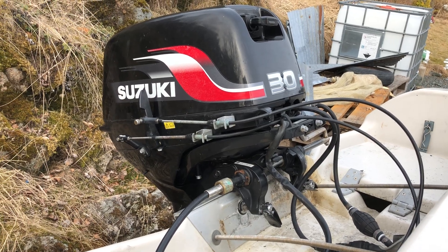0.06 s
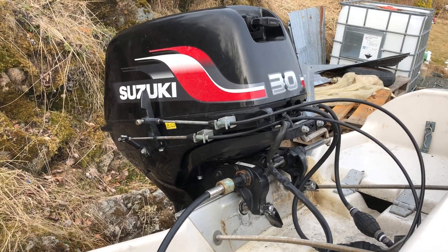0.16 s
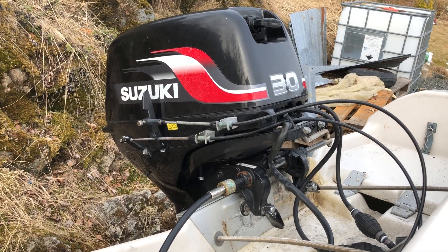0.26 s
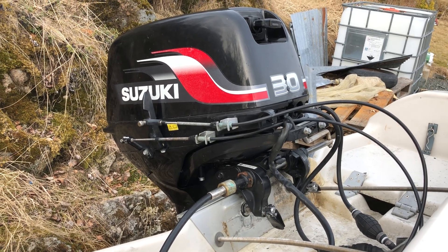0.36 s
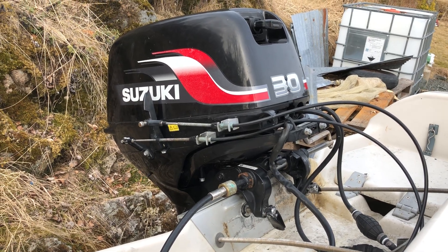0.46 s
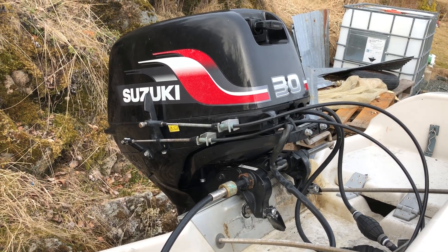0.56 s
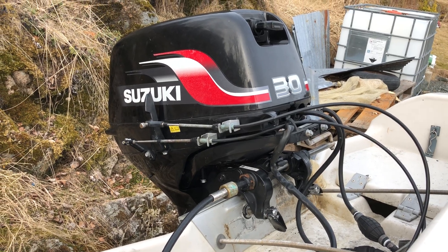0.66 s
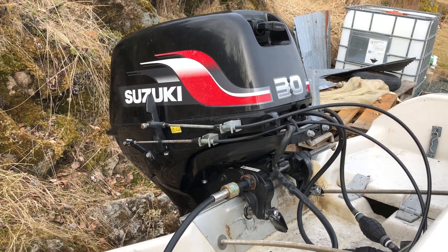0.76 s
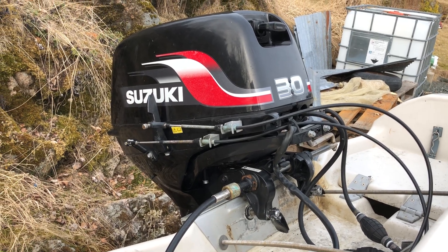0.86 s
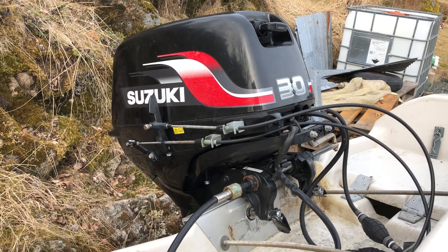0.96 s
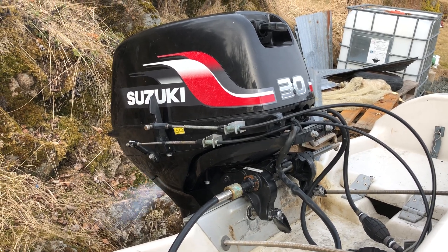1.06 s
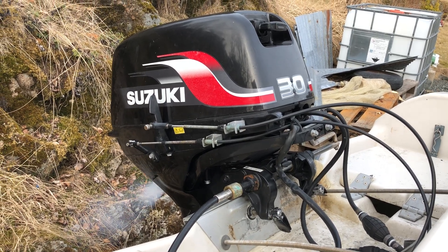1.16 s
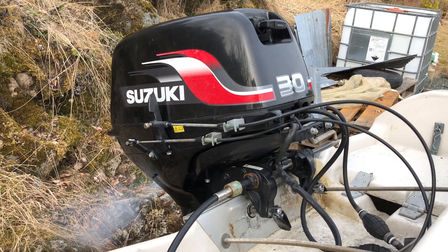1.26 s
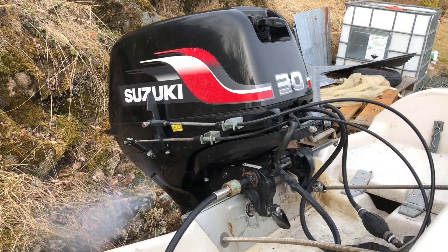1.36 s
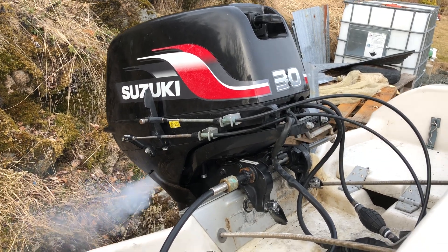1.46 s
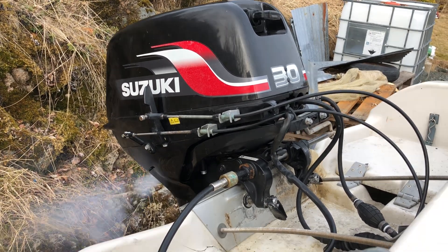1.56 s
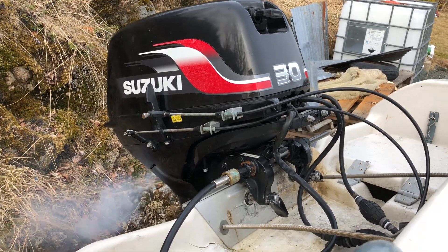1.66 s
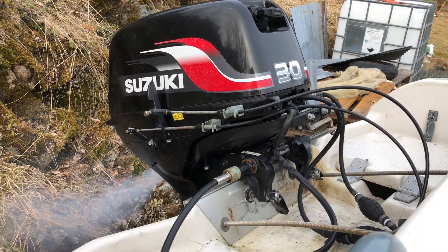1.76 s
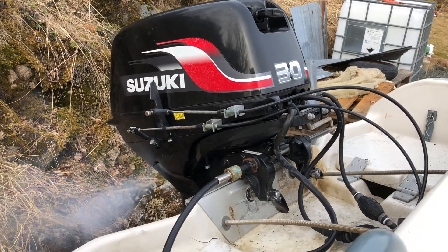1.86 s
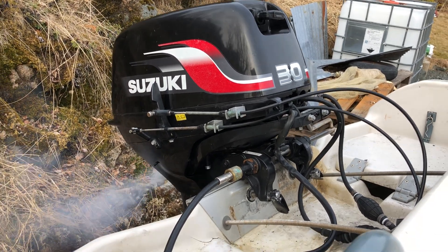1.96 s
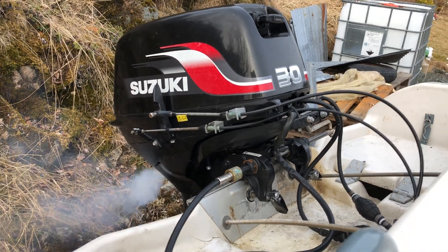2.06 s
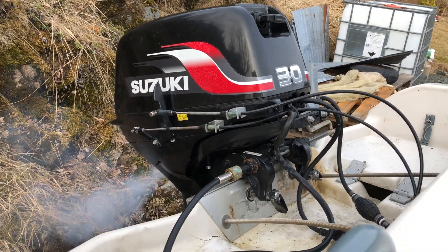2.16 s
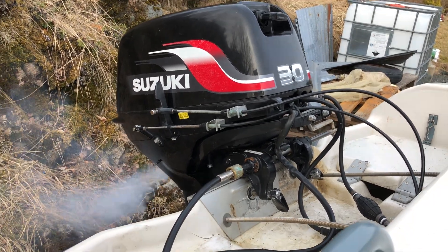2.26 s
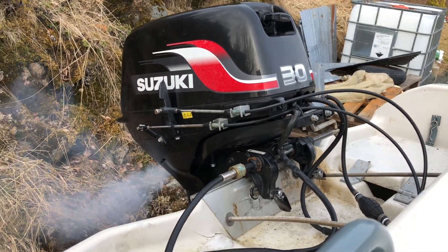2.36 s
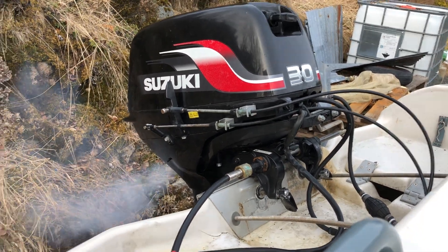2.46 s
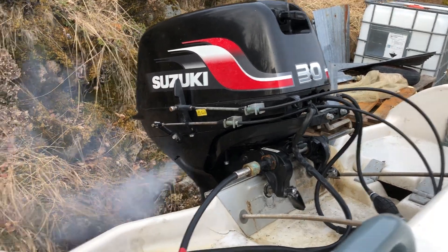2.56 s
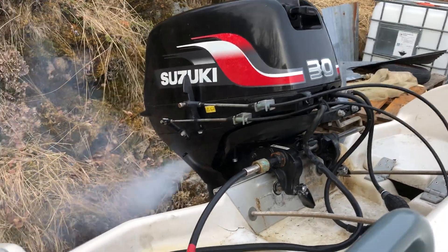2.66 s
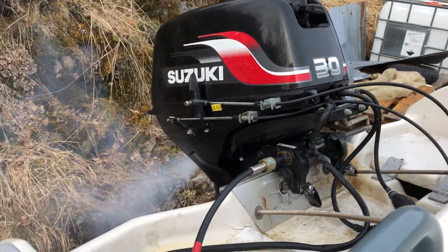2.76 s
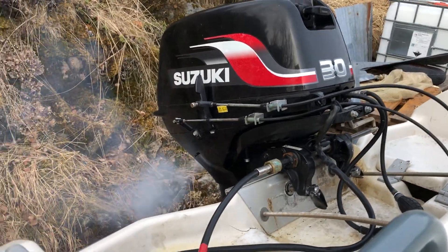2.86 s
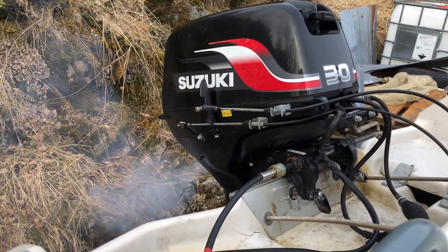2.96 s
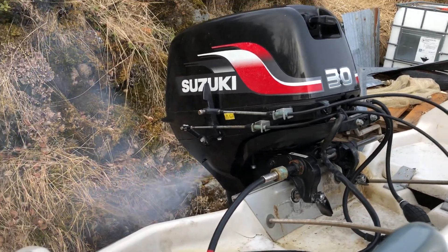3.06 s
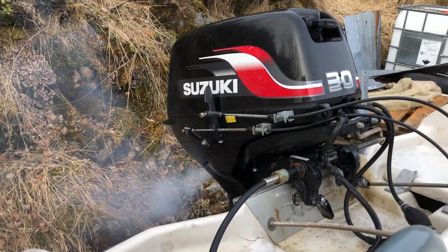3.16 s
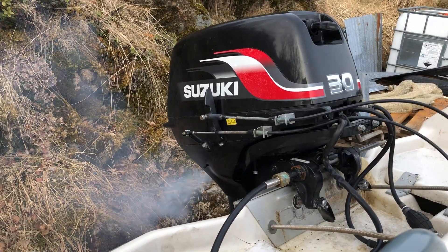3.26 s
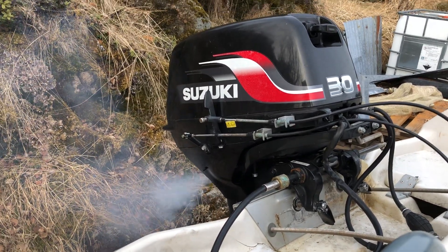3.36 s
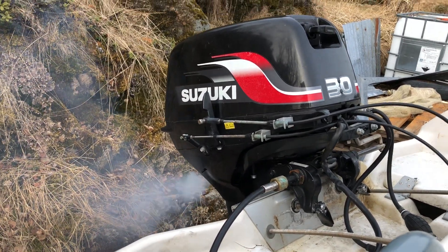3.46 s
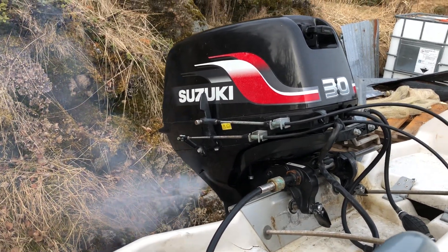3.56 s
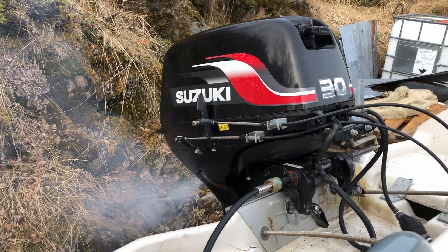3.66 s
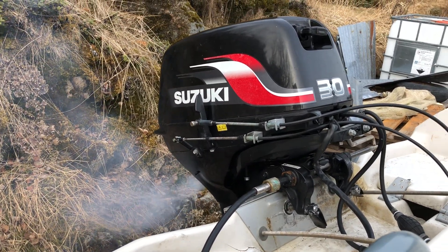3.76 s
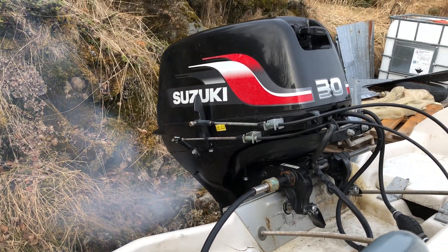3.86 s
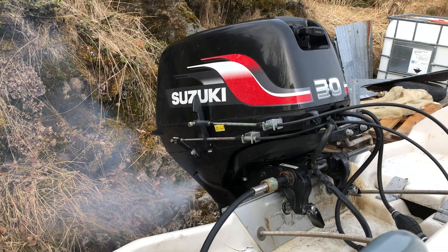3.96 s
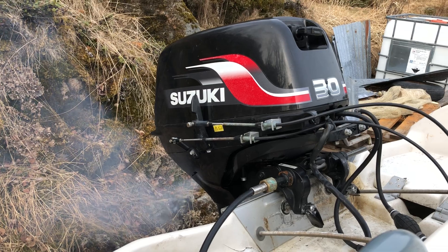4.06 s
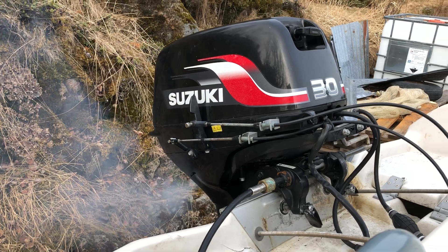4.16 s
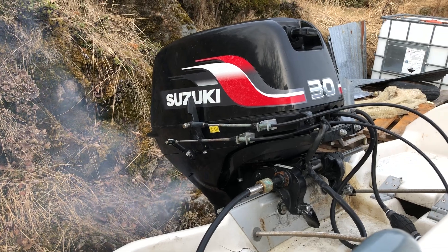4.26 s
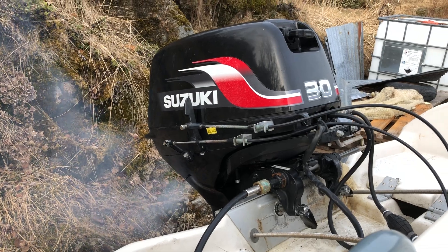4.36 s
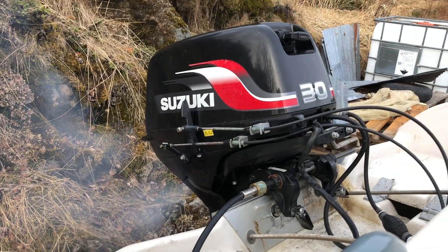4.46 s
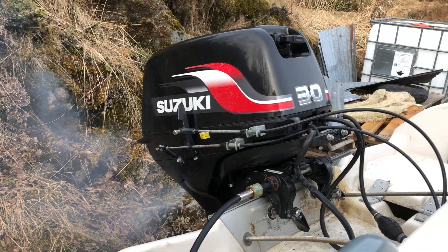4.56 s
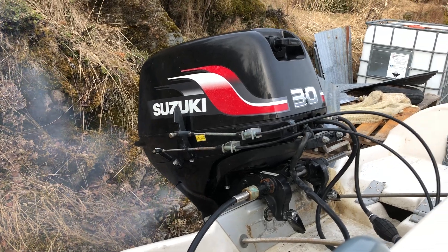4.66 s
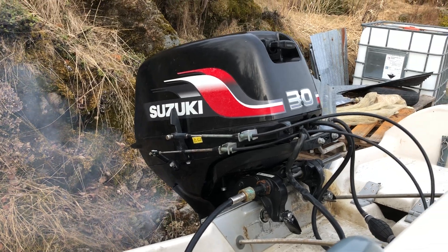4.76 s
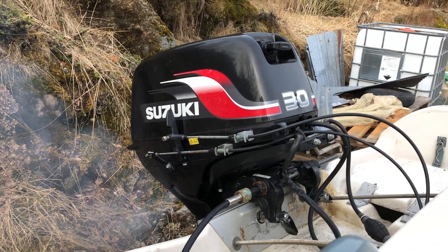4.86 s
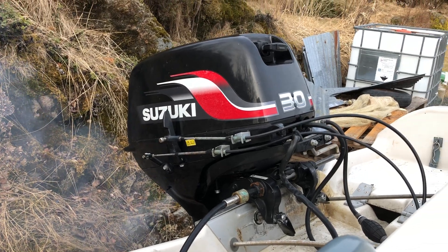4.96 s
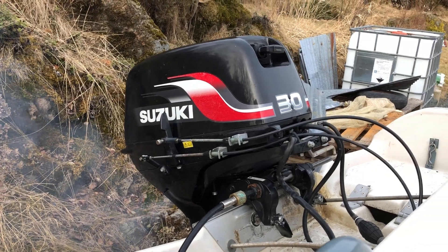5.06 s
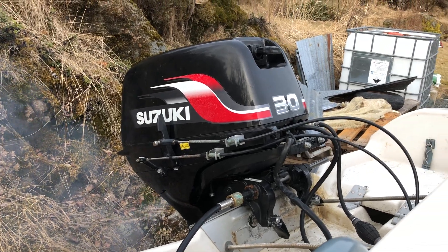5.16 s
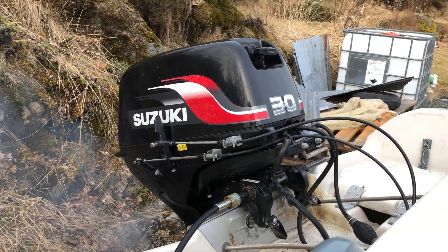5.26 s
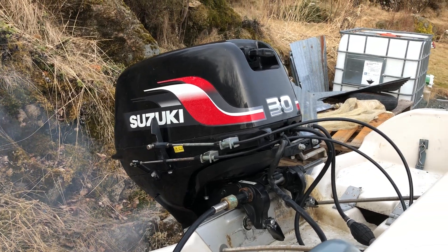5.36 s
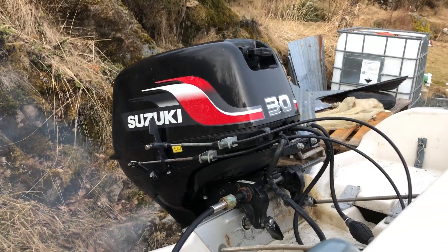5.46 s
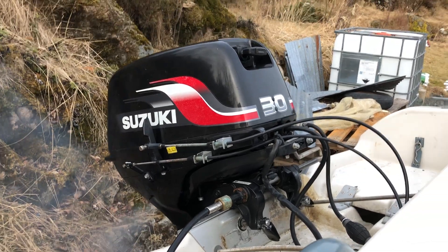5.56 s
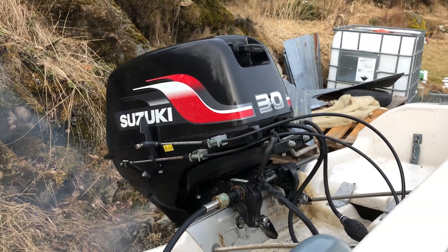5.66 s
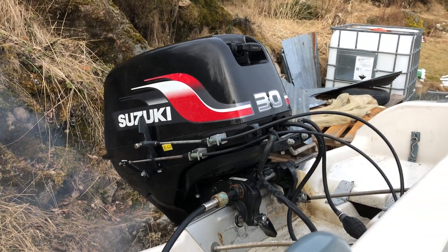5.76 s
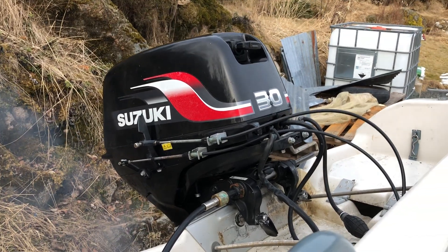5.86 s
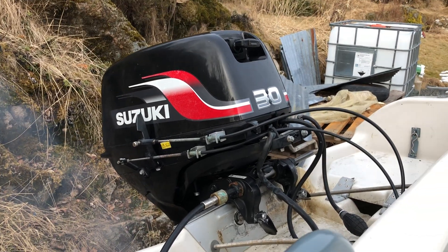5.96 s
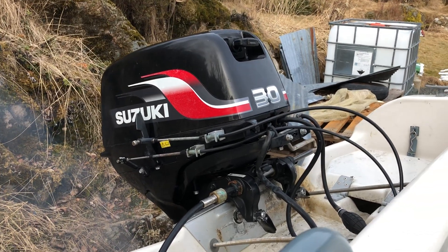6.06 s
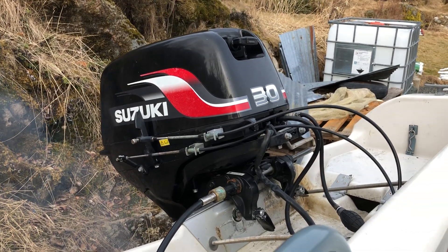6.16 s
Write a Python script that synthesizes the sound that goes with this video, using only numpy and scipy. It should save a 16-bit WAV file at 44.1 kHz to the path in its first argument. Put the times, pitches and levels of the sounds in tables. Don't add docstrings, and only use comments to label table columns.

```python
import sys
import numpy as np
from scipy import signal
from scipy.fft import rfft, irfft, next_fast_len
from scipy.io import wavfile
from scipy.ndimage import uniform_filter1d, map_coordinates

SR = 44100
rng = np.random.default_rng(int(sys.argv[2]) if len(sys.argv) > 2 else 0)


def log_audio(samples):
    frames = np.atleast_2d(samples).T
    limited = np.clip(frames, -1, 1)
    pcm = np.round(limited * 32767).astype(np.int16)
    wavfile.write(sys.argv[1], SR, pcm)


def to_linear_factor(level_db):
    exponent = np.asarray(level_db, float) / 20
    return 10 ** exponent


N = 272979

# freq_hz, density_db
AIR_SPECTRUM = [(30, -20.5), (100, -1), (300, -14), (1000, -24.5), (5000, -36), (15000, -39)]
# start_s, level_db
COOLING_TICKS = [
    (6.055, -61.5),
    (6.132, -63.5),
    (6.162, -64),
    (6.175, -68),
]
# start_s, peak_db, pitch_hz, t60_ms
LOOSE_PARTS = [(0.069, -19, 408, 59), (0.116, -22.5, 517, 90), (1.134, -10, 1840, 34),
               (1.951, -26, 2730, 27), (2.578, -14.5, 1426, 39), (3.859, -28, 142.2, 420),
               (3.969, -24, 141, 390), (5.256, -23, 2394, 26), (5.49, -43, 2190, 240),
               (5.53, -34.5, 827, 210), (5.605, -33, 840, 65), (5.659, -39, 828, 250),
               (5.69, -24, 2755, 33), (5.69, -27, 3320, 33), (5.691, -30, 4900, 36), (5.69, -35, 6500, 24),
               (5.755, -33, 840, 82), (5.769, -35, 262.5, 320), (5.785, -43, 2190, 170),
               (5.815, -35.5, 823, 190), (5.838, -36, 1030, 60), (5.835, -53, 1420, 230),
               (5.815, -34, 1500, 34), (5.845, -51, 4230, 170), (5.795, -37, 620, 47),
               (5.84, -43, 550, 125), (5.565, -24, 976, 40), (4.932, -28, 945, 50), (5.844, -46, 1880, 140),
               (5.915, -50, 828, 180), (5.915, -43, 259, 170), (5.955, -52, 8000, 32),
               (5.985, -59.5, 8170, 49), (6.135, -51.5, 506, 120)]

# time_s, hull_load_db, whirr_db
RUNNING_LEVELS = [(1.048, -57, -41), (1.17, -26, -39.5), (1.6, -25.5, -35.5), (2.1, -25.5, -37),
                  (2.6, -26, -37), (3.05, -27.5, -38.5), (3.5, -34, -37.5), (4.1, -31, -40.5),
                  (4.5, -33, -42.5), (4.899, -34, -43.5), (5.301, -35, -52), (5.601, -42, -54),
                  (5.77, -38.5, -69), (5.87, -47, -60), (5.971, -56.5, -81.5), (6.051, -82, -84),
                  (6.19, -72, -79)]
# freq_hz, density_db
WHIRR_SPECTRUM = [(150, -11.5), (250, 3.5), (336, -18.5), (484, -2), (747, -42), (828, -5), (1110, -22.5),
                  (4620, -24), (6540, -21), (7260, -27.5), (15900, -31.5)]
# freq_hz, density_db
HULL_SPECTRUM = [(25, -7.5), (45, -7), (80, -1), (140, -3.5), (180, -4.5), (260, -7.5), (330, -12.5),
                 (450, -58.5)]
# centre_hz, width_hz, level_db
CRANKCASE_MODES = [(1350, 120, 2), (2190, 530, -4.5), (2870, 520, -5), (3790, 460, -9), (5500, 150, -6.5),
                   (5990, 110, -2), (6610, 200, -4.5), (6845, 90, -2.5), (8650, 53, -14.5),
                   (9370, 250, -13), (10200, 160, -8.5), (10700, 140, -7.5)]

# time_s, pitch_hz
LEG_PITCH = [(1.172, 220), (1.33, 203.9), (1.62, 221.5), (2.15, 199.2), (2.98, 213.3), (3.15, 198.4),
             (3.34, 207.3), (3.61, 193), (3.81, 213.3), (3.88, 199.6), (4.28, 202.5), (4.32, 218.4),
             (4.8, 197.7), (5.31, 200.1), (5.36, 214), (5.68, 213.5)]
# centre_s, peak_db, length_ms
SLOW_BOOMS = [
    (5.085, -31, 18),
    (5.19, -27, 30),
    (5.28, -27, 31),
    (5.402, -20, 37),
    (5.522, -24, 44),
    (5.646, -23, 24.4),
]

# port_s, port_db, other_port_db (just before), boom_db, boom_ms
FIRINGS = [(1.12, -31, -35, -29, 32), (1.294, -27.5, -25.5, -8, 28), (1.408, -24.5, -23.5, -6.5, 28),
           (1.558, -23, -60, -12.5, 34), (1.721, -23, -23, -16, 44), (1.877, -20.5, -60, -10, 17),
           (2.011, -23, -23.5, -7.5, 30.5), (2.181, -23.5, -23.5, -7.5, 33), (2.243, -25.5, -60, -6, 21),
           (2.305, -24.5, -60, -12.5, 46), (2.371, -28, -60, -16.5, 25), (2.482, -24, -40, -11, 47),
           (2.614, -24, -30.5, -8.5, 19), (2.752, -24, -60, -9.5, 23), (2.902, -23.5, -28.5, -7.5, 40.5),
           (2.996, -26.5, -30, -42, 20), (3.098, -25, -31, -14.5, 40), (3.207, -25.5, -34, -15.5, 46),
           (3.323, -25.5, -51, -18, 30), (3.444, -28, -37, -14.5, 28), (3.565, -28.5, -60, -16, 28),
           (3.688, -27, -31.5, -14.5, 28), (3.81, -29, -32, -14, 23), (3.933, -30, -29.5, -13.5, 20)]
# port_s, port_db, throat_pop_db, boom_db, boom_ms
MISFIRES = [(1.157, -60, -23.5, -13.5, 10), (1.181, -29, -70, -8.5, 37), (1.206, -32.5, -21, -41, 20),
            (1.245, -60, -79, -10.5, 42), (1.335, -60, -60, -19.5, 17), (1.374, -36.5, -62, -49.5, 20),
            (1.478, -27, -63, -11, 28), (1.579, -24.5, -60, -37.5, 16), (1.77, -60, -60, -20, 30),
            (1.809, -25.5, -60, -20, 7.9), (1.829, -60, -60, -11, 4.2), (1.895, -25, -60, -44, 21.6),
            (1.976, -39.5, -60, -35.5, 15), (2.072, -26, -60, -9, 10.4), (2.322, -28.5, -61.5, -44, 20),
            (2.393, -30, -60, -38, 20.6), (2.415, -60, -22, -10, 17), (2.459, -60, -25, -12, 9.3),
            (2.545, -39.5, -23.5, -9.5, 18), (2.576, -31, -30, -19.5, 25.2), (2.678, -31.5, -25, -23, 5.1),
            (2.719, -33, -60, -36, 24), (2.788, -39.5, -27, -10.5, 14), (2.822, -38, -25, -8, 7.2),
            (2.872, -60, -30, -19, 15), (2.958, -39, -60, -41, 20), (2.972, -60, -26, -10, 71),
            (3.378, -52, -32, -31, 25), (3.495, -48, -30, -22.5, 23), (3.747, -40, -28, -22, 19.7),
            (3.867, -33, -30, -17, 26.5)]
# port_s, port_db, boom_db, boom_ms
COASTING_TURNS = [(3.991, -32, -15.5, 28), (4.057, -29, -18.5, 30), (4.118, -30.5, -14.5, 37),
                  (4.182, -29.5, -16.5, 47), (4.247, -29.5, -19.5, 31), (4.312, -30.5, -21.5, 24),
                  (4.382, -30, -17.5, 33), (4.454, -30, -19.5, 33), (4.527, -30, -18, 42),
                  (4.602, -32.5, -47, 30), (4.683, -29, -21.5, 28), (4.762, -31, -23.5, 15.3),
                  (4.847, -30.5, -24, 41), (4.933, -30.5, -24, 51), (5.022, -30.5, -23, 36),
                  (5.113, -31, -26, 34.4), (5.206, -32.5, -25, 36.6), (5.319, -29.5, -23, 40),
                  (5.439, -30, -23, 43), (5.559, -31.5, -25, 30), (5.689, -60, -47, 23.6)]
# start_s, level_db, length_ms
LAST_BREATHS = [
    (5.696, -42.5, 51),
    (5.79, -52.5, 45),
    (5.838, -53, 28),
    (5.88, -72, 58),
]
# start_s, level_db
THROAT_POPS = [(1.123, -22), (1.28, -24), (1.299, -19.5), (1.315, -32), (1.39, -22), (1.415, -28.5),
               (1.483, -22.5), (1.505, -30), (1.563, -25.5), (1.582, -22), (1.707, -25.0), (1.727, -17.5),
               (1.811, -19.5), (1.852, -29.0), (1.882, -20.5), (1.902, -17.5), (1.916, -27.5),
               (1.991, -21.0), (2.013, -27.0), (2.05, -32), (2.075, -21), (2.114, -31), (2.162, -21),
               (2.184, -20), (2.244, -22.5), (2.314, -24.0), (2.331, -21), (2.374, -20.5), (2.487, -27.0),
               (2.504, -25.5), (2.593, -21.5), (2.635, -27.5), (2.702, -26), (2.727, -23), (2.754, -26),
               (2.775, -24), (2.905, -31), (2.926, -21), (2.942, -26), (2.994, -37), (3.02, -32),
               (3.099, -28.5), (3.151, -33), (3.18, -32), (3.205, -29), (3.231, -30), (3.259, -30.0),
               (3.321, -25), (3.355, -29), (3.395, -34.0),
               (3.443, -27), (3.476, -35), (3.563, -25), (3.578, -26), (3.597, -32), (3.686, -31),
                (3.721, -32), (3.809, -26), (3.84, -36), (3.934, -28.0), (3.995, -29.5), (4.057, -26.5),
                (4.085, -34), (4.119, -30), (4.148, -40), (4.186, -28.5), (4.247, -29.5), (4.312, -32.5),
                (4.381, -28.5), (4.451, -29), (4.526, -27), (4.572, -35.0), (4.604, -35.0), (4.642, -34),
                (4.683, -30.0), (4.767, -37.5), (4.802, -35.0), (4.845, -29), (4.866, -42), (4.887, -38),
                (4.93, -34), (4.955, -45), (4.977, -43), (5.024, -35), (5.058, -40), (5.119, -37.0),
                (5.17, -46), (5.213, -46), (5.256, -44), (5.304, -43), (5.321, -47), (5.34, -44),
                (5.372, -37.0), (5.445, -37), (5.493, -38.0), (5.567, -38), (5.586, -44.5), (5.617, -36.5),
                (5.643, -46), (5.69, -47)]
# centre_hz, width_hz, level_db
THROAT_MODES = [(466, 220, 2), (971, 980, -11.5), (298, 110, -20.5), (666, 260, -15.5)]
# freq_hz, density_db
BLAST_SPECTRUM = [(530, -64), (900, 7.5), (1170, -11.5), (1320, -3.5), (2240, -1.5), (4610, -5.5),
                  (5070, 3), (7270, -9), (9930, -13), (15900, -14.5)]
# freq_hz, density_db
SIGH_SPECTRUM = [(300, -13.5), (1000, -15.5), (4600, -20.5), (6500, -15), (7200, -24), (10600, -23),
                 (11300, -31.5), (15900, -24.5)]
# centre_hz, width_hz, level_db
BLOCK_MODES = [(1880, 41, 5.5), (2185, 96, 3), (2636, 73, 3.5), (3146, 44, 1.5), (4330, 98, 1.5),
               (5300, 66, -5), (6450, 150, -2), (6540, 190, -11), (8000, 170, -8.5), (9100, 160, -7.5),
               (9770, 190, -6)]

# start_s, gear_peak_db, whine_db, boom_db
COMPRESSIONS = [(0.0014, -20.5, -30.5, -32), (0.0872, -18.5, -30, -37), (0.169, -18, -28, -21),
                (0.2428, -20, -28, -27.5), (0.3154, -19, -31, -45), (0.387, -17, -28, -30),
                (0.4569, -19, -30, -46), (0.5292, -19, -26.5, -26), (0.601, -17, -28, -30.5),
                (0.6709, -18.5, -27.5, -31), (0.742, -19.5, -27.5, -22), (0.8131, -19, -26.5, -25),
                (0.8844, -19, -28, -29), (0.9545, -18, -28, -23.5), (1.0241, -17, -28.5, -23),
                (1.0896, -20.5, -29, -33)]
# centre_hz, width_hz, level_db
GEAR_MODES = [(1324, 15, -3.5), (1510, 31, -11.5), (1723, 21, -7.5), (2570, 63, -7.5), (3260, 170, -10),
              (3932, 110, -10.5), (4230, 37, -12.5), (4630, 98, -16), (6010, 79, -12.5), (8440, 63, -22.5),
              (9330, 90, -20), (12900, 410, -34.5)]
# centre_hz, width_hz, level_db
LOADED_MODES = [(2560, 230, -5), (3330, 200, -0.5), (4280, 76, -1.5), (3770, 300, -7)]
# centre_hz, width_hz, level_db
ARMATURE_MODES = [(535, 63, -7.5), (1760, 45, -5.5), (6484, 110, -7.5), (9370, 60, -22), (8500, 150, -20),
                  (10800, 160, -25)]
# pitch_hz, level_db, t60_ms
PINION_RINGS = [(2583, -6.5, 40), (3280, 0.5, 63), (3845, -3, 40), (4230, -11, 30), (5900, -16.5, 48),
                (6560, -10.5, 45), (9300, -16, 44), (677, -2.5, 54), (1320, -15.5, 30)]
# freq_hz, density_db
GRIND_SPECTRUM = [(28, -26), (60, -10.5), (150, -11.5), (215, -1.5), (380, -6), (550, -8.5), (1000, -12),
                  (1600, -17), (3300, -15), (5000, -23), (15900, -42)]
# freq_hz, density_db
TOOTH_SPECTRUM = [(300, -14.5), (1500, -14), (3300, -13), (6500, -14), (9300, -19.5), (13000, -25),
                  (15900, -26)]


def unit(x):
    return x / np.sqrt(np.mean(x ** 2) + 1e-20)


def filtered(x, response):
    m = next_fast_len(N + SR // 2)
    hz = np.arange(SR // 2 + 1.)
    gain = np.interp(np.fft.rfftfreq(m, 1 / SR), hz, response(hz))
    return irfft(rfft(x, m) * gain, m)[:N]


def shape(points):
    f, db = np.transpose(points)
    return lambda hz: to_linear_factor(np.interp(np.log(hz + 1), np.log(f + 1), db))


def modes(rows):
    def response(f):
        return sum((-1) ** k * to_linear_factor(db) * 1j * f * width / (centre * centre - f * f + 1j * f * width)
                   for k, (centre, width, db) in enumerate(rows))
    return response


def wobble(rate_hz):
    knots = rng.standard_normal(int(N * rate_hz / SR) + 4)
    return map_coordinates(knots, [np.arange(N) * rate_hz / SR])


def noise(response, gate=1, grain_db=0, patchy_db=0):
    raw = rng.standard_normal(N + 256)
    if patchy_db:
        z = signal.stft(raw, nperseg=256)[2]
        field = uniform_filter1d(rng.standard_normal(z.shape), size=3, axis=0)
        field = uniform_filter1d(field, size=7, axis=1)
        raw = signal.istft(z * to_linear_factor(patchy_db * unit(field)), nperseg=256)[1]
    raw = unit(raw[:N] * to_linear_factor(grain_db * wobble(500)))
    power = np.mean(np.abs(response(np.arange(0, SR / 2, 2.))) ** 2)
    return filtered(raw * gate, response) / np.sqrt(power)


def add(track, start_s, piece):
    part = track[max(round(start_s * SR), 0):][:len(piece)]
    part += piece[:len(part)]


def air():
    return to_linear_factor(-64.5) * noise(shape(AIR_SPECTRUM))


def cooling_ticks():
    gate, t = np.zeros(N), np.arange(SR // 50) / SR
    for start_s, db in COOLING_TICKS:
        add(gate, start_s, to_linear_factor(db) * np.exp(-t / .002))
    return noise(shape([(9000, -30.5), (14500, 2)]), gate)


def loose_parts():
    out, t = np.zeros(N), np.arange(SR // 5) / SR
    for start_s, db, hz, t60_ms in LOOSE_PARTS:
        click = uniform_filter1d(rng.standard_normal(len(t)), size=4)
        tick = 18 / t60_ms * np.exp(-t / 0.0032) * click
        stray = 0.00003 * hz * np.cumsum(rng.standard_normal(len(t)))
        envelope = to_linear_factor(-60e3 * t / t60_ms) * (1 - np.exp(-t / 0.0071))
        add(out, start_s, to_linear_factor(db) * (envelope * np.sin(2 * np.pi * hz * t + stray) + tick))
    return out * to_linear_factor(1.2 * wobble(170) + 1.6 * wobble(60))


def running_parts():
    throat_db = -13
    time_s, *columns = np.transpose(RUNNING_LEVELS)
    load_db, whirr_db = [np.interp(np.arange(N) / SR, time_s, c) for c in columns]
    on = np.arange(N) > time_s[0] * SR
    hull = 0.67 * noise(shape(HULL_SPECTRUM)) + 0.45 * noise(modes([(194.0, 21.0, 0)]))
    shake = to_linear_factor(load_db + 2.6 * wobble(14)) * hull
    gurgle_gate = on * to_linear_factor(load_db + throat_db + 4 * wobble(40))
    gurgle = noise(modes([(490, 130, -1), (880, 260, -4)]), gurgle_gate)
    gate = on * to_linear_factor(whirr_db + 0.79 * wobble(25.043))
    whirr = noise(shape(WHIRR_SPECTRUM), to_linear_factor(-0.5) * gate)
    intake = noise(modes(CRANKCASE_MODES), to_linear_factor(-3.5) * gate, patchy_db=3.0)
    return shake + gurgle + whirr + intake


def boom_events():
    lag_s, rise = 0.0098, 0.55
    crank_lag_s, crank_ms = .012, 15.6
    rows = [(r[0], *r[-2:]) for r in FIRINGS + MISFIRES + COASTING_TURNS]
    driven = [(s + lag_s + rise * ms / 1000, db, ms) for s, db, ms in rows]
    cranked = [(r[0] + crank_lag_s, r[-1], crank_ms) for r in COMPRESSIONS]
    return driven + cranked + SLOW_BOOMS


def leg_booms():
    crank_hz, hum_db = 228.84, -11
    full_db, squarer = -14, 0.17
    now_s = np.arange(N) / SR
    time_s, load_db, _ = np.transpose(RUNNING_LEVELS)
    hum = np.interp(now_s, time_s, load_db, left=-90) + hum_db
    power = to_linear_factor(1.99 * (hum + 2.5 * wobble(22)))
    for centre_s, db, ms in boom_events():
        half = int(ms * SR / 700)
        t = np.arange(-half, half) / SR
        flatness = 2.44 + squarer * max(db - full_db, 0)
        swell = np.exp(-2 * np.abs(t / (ms * 0.00064)) ** flatness)
        add(power, centre_s + t[0], to_linear_factor(2 * db - 7.0) * swell)
    hz = np.interp(now_s, *np.transpose(LEG_PITCH), left=crank_hz) * (1 + .022 * wobble(60))
    phase = 2 * np.pi * np.cumsum(hz) / SR
    column = (np.sin(phase) + .07 * np.sin(2 * phase + 2.1)) * to_linear_factor(.7 * wobble(110))
    churn = .09 * noise(modes([(210, 130, 0)]))
    return np.sqrt(power) * (column + churn + 0.12 * noise(shape(HULL_SPECTRUM)))


def starter():
    t = np.arange(SR // 10) / SR
    load, blows, whine, teeth, bite = np.zeros((5, N))
    for start_s, db, whine_db, _ in COMPRESSIONS:
        slack = np.exp(-t / 0.019) * (1 - np.exp(-t / 0.00064))
        strain = 0.26 * np.exp(-((t - .033) / 0.017) ** 2)
        release = np.exp(-(t / 0.069) ** 6)
        add(bite, start_s, to_linear_factor(db - 14.5) * np.exp(-np.abs((t - .028) / .013) ** 3))
        add(load, start_s, to_linear_factor(db - 11) * (slack + strain) * release)
        ring = 0
        for hz, level_db, t60_ms in PINION_RINGS:
            decay = to_linear_factor(level_db + rng.normal(0, 4.6) - 41000.0 * t / t60_ms)
            ring = ring + decay * np.sin(2 * np.pi * hz * rng.normal(1, 0.0052) * t + rng.uniform(0, 5.4))
        add(blows, start_s, to_linear_factor(db - 12.0) * (1 - np.exp(-t / 0.00084)) * ring)
        add(teeth, start_s, to_linear_factor(db - 24.0) * np.exp(-t / 0.0084))
        glide = 2 * np.pi * np.cumsum(1070 - 9e5 * np.clip(t - .018, 0, .022) ** 2) / SR
        glide_env = np.exp(-np.abs((t - .029) / 0.0095) ** 3)
        add(whine, start_s, to_linear_factor(whine_db) * glide_env * np.sin(glide))
        bell = np.sin(2 * np.pi * (535 + rng.normal(0, 8.3)) * t + rng.uniform(0, 9.4))
        bell_env = np.exp(-((t - .031) / .008) ** 2) + .28 * np.exp(-((t - .045) / .011) ** 2)
        add(whine, start_s, to_linear_factor(whine_db + 0.5) * bell_env * bell)
    bog = np.sin(np.pi * np.clip(t / 0.062, 0, 1)) * np.sin(2 * np.pi * (590 - 2300 * t) * t)
    add(whine, .015, to_linear_factor(-30.0) * bog)
    turning = to_linear_factor(2.5 * wobble(40)) * (np.arange(N) < 1.15 * SR)
    gear_gate = to_linear_factor(-1.0) * load + to_linear_factor(-47.5) * turning
    gears = noise(modes(GEAR_MODES), gear_gate, grain_db=2.0, patchy_db=2.5)
    rasp_gate = to_linear_factor(-11.0) * load + to_linear_factor(-35.0) * turning
    rasp = noise(shape(GRIND_SPECTRUM), rasp_gate, grain_db=3.0, patchy_db=-1.0)
    contact = noise(shape(TOOTH_SPECTRUM), to_linear_factor(7.5) * teeth, grain_db=1.0)
    spin = noise(modes(ARMATURE_MODES), to_linear_factor(-42.5) * turning + to_linear_factor(-25.5) * load)
    struck = blows * to_linear_factor(3.2 * wobble(400))
    return gears + rasp + contact + spin + whine + struck + noise(modes(LOADED_MODES), bite)


def second_ports():
    half_turn, loss_db = 0.49, -6.5
    s, db = np.transpose(COASTING_TURNS)[:2]
    return list(zip(s[:-1] + half_turn * np.diff(s), db[:-1] + loss_db))


def port_openings():
    lead_s = 0.02
    puff_ms, puff_per_gap, fired_ms, ms_per_db = 3.9, 0.66, 20.9, 3.5
    rows = [r[:2] for r in FIRINGS + MISFIRES + COASTING_TURNS]
    rows += [(r[0] - lead_s, r[2]) for r in FIRINGS] + second_ports()
    s, db = np.transpose(sorted(tuple(r) for r in rows if r[1] > -56))
    gap_ms = 1000 * np.diff(s, append=s[-1] + .06)
    longest_ms = fired_ms + ms_per_db * np.clip(-26.0 - db, 0, 9)
    return np.transpose([s, db, np.minimum(puff_ms + puff_per_gap * gap_ms, longest_ms)])


def throat_pop():
    t = np.arange(SR // 10) / SR
    swell = (t / 0.0053) ** 2 * np.exp(2 - 2 * t / 0.0047)
    return swell * sum(to_linear_factor(db + rng.normal(0, 1)) * np.sin(2 * np.pi * hz * rng.normal(1, 0.029) * t)
                       for hz, _, db in THROAT_MODES)


def exhaust():
    hard, soft, pops = np.zeros((3, N))
    t = np.arange(SR // 10) / SR
    openings = port_openings()
    for (port_s, db, ms), usual_db in zip(openings, uniform_filter1d(openings[:, 1], size=7)):
        fired = np.clip(0.71 + (db - usual_db) / 6, 0, np.clip((db + 37.5) / 11, .15, .85))
        rise = 1 - np.exp(-t / (.008 - 0.0073 * fired))
        puff = to_linear_factor(db) * rise * np.exp(-(t / (ms * 0.00082)) ** 2)
        sigh = to_linear_factor(db - 2.5) * np.exp(-np.abs(t / (ms * 0.00058) - .9) ** 4)
        add(hard, port_s - .001, fired * puff)
        add(soft, port_s - .004, (1 - fired) * sigh)
    for port_s, _, db, _, _ in MISFIRES:
        add(pops, port_s, to_linear_factor(db) * throat_pop())
    for start_s, db in THROAT_POPS:
        add(pops, start_s, to_linear_factor(db - 2.0) * throat_pop())
    overrun = np.sin(np.pi * np.clip(t / 0.059, 0, 1)) ** 0.42
    add(hard, 1.088, to_linear_factor(-32.5) * overrun)
    add(hard, 1.128, to_linear_factor(-27.5) * np.exp(-t / 0.04))
    add(hard, 5.6895, to_linear_factor(-30) * np.exp(-t / 0.0035))
    for start_s, db, ms in LAST_BREATHS:
        add(soft, start_s, to_linear_factor(db) * np.exp(-np.abs(t / (ms * 0.00055) - 0.9) ** 2.3))
    blast = noise(shape(BLAST_SPECTRUM), to_linear_factor(-1.3) * hard, grain_db=2, patchy_db=1.5)
    ring = noise(modes(BLOCK_MODES), to_linear_factor(-3.5) * hard, grain_db=2.5, patchy_db=0.5)
    breath = noise(modes(CRANKCASE_MODES), to_linear_factor(-2.5) * soft, patchy_db=6.0)
    sighs = noise(shape(SIGH_SPECTRUM), to_linear_factor(-1.5) * soft, grain_db=1.0)
    rasp = noise(modes(THROAT_MODES), to_linear_factor(-7) * hard + to_linear_factor(-17.5) * soft, grain_db=1)
    return blast + ring + breath + sighs + rasp + pops


def shell():
    panel_hz, panel_db = 69.77, 2
    dip_hz, dip_width_hz, dip_depth = 759, 34.3, 0.69
    knots = rng.standard_normal(2000)

    def response(hz):
        ragged_db = panel_db * map_coordinates(knots, [hz / panel_hz]) - 0.97
        dip = 1 - dip_depth / (1 + ((hz - dip_hz) / dip_width_hz) ** 2)
        return dip * to_linear_factor(ragged_db * np.clip(hz / 1000 - 1, 0, 1))
    return response


def bank_echo(motor):
    t = np.arange(SR // 5) / SR
    scatter = rng.standard_normal(len(t)) * to_linear_factor(-60 * t / 0.28) * (t > .004)
    echo = signal.fftconvolve(motor, scatter / np.linalg.norm(scatter))[:N]
    return filtered(echo, lambda hz: 1 / (1 + 1j * hz / 3000))


def scene():
    cowl = shell()
    motor = starter() + filtered(exhaust(), cowl) + loose_parts()
    background = air() + cooling_ticks() + filtered(running_parts(), cowl)
    return (background + leg_booms() + motor + to_linear_factor(-8.5) * bank_echo(motor))[None]


def top_cut(x):
    return signal.sosfilt(signal.butter(12, 16010, fs=SR, output="sos"), x)


def record(dry):
    bass_hz, top_hz = 37, 15850
    mic = lambda hz: (hz < top_hz) / np.sqrt(1 + (bass_hz / (hz + 1)) ** 10)
    return top_cut(filtered(dry[0], mic)[None])


dry = scene()
out = record(dry)
log_audio(out)
```